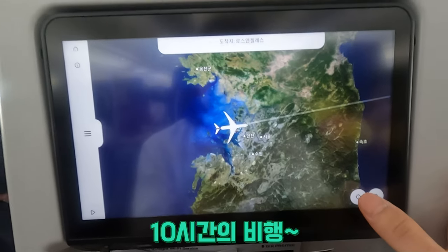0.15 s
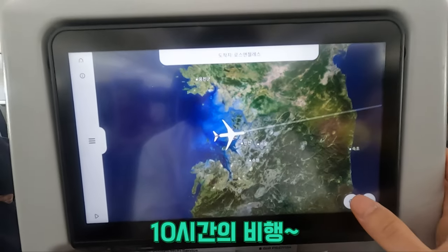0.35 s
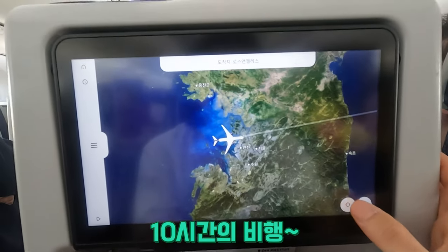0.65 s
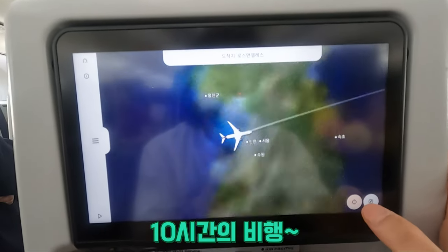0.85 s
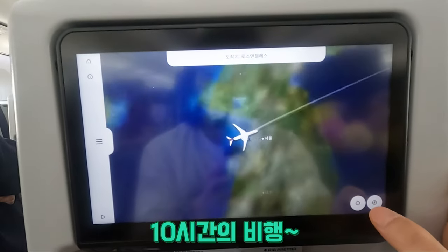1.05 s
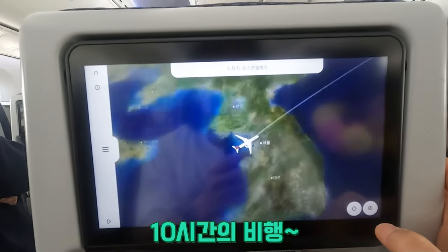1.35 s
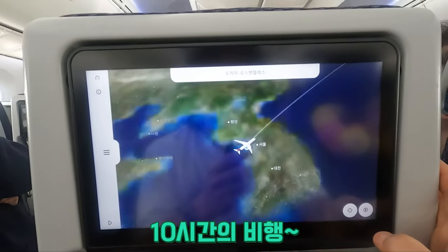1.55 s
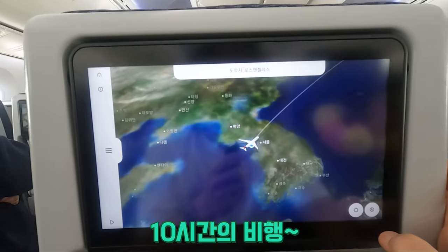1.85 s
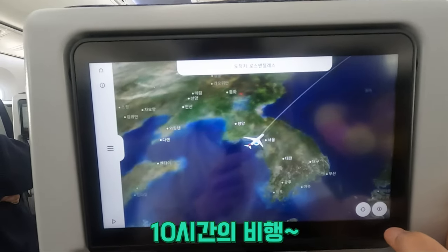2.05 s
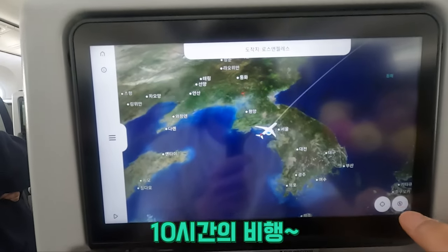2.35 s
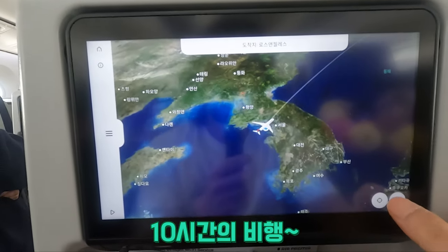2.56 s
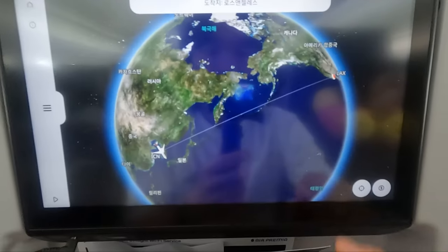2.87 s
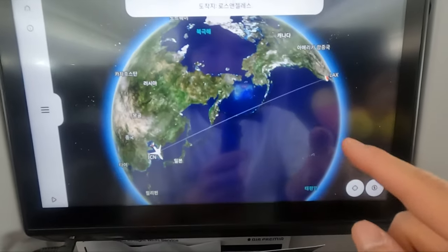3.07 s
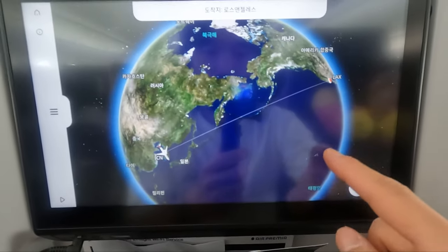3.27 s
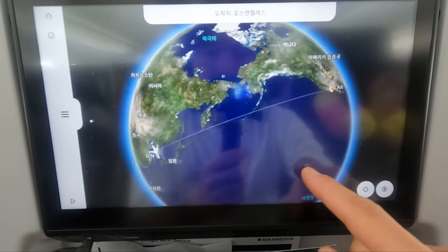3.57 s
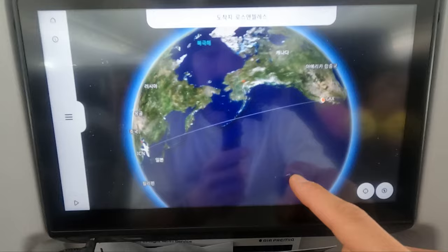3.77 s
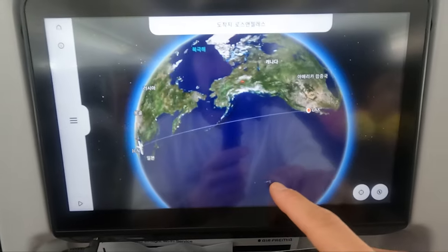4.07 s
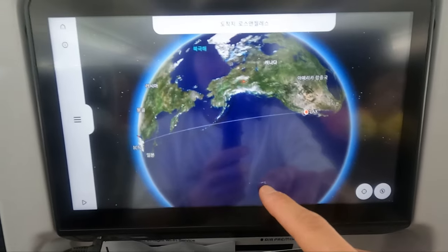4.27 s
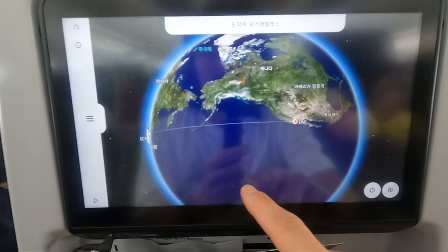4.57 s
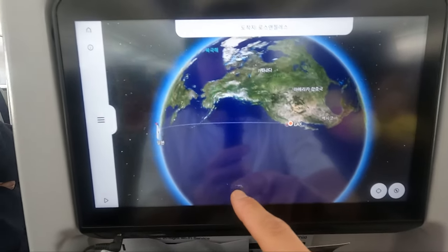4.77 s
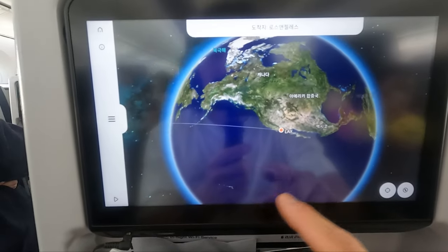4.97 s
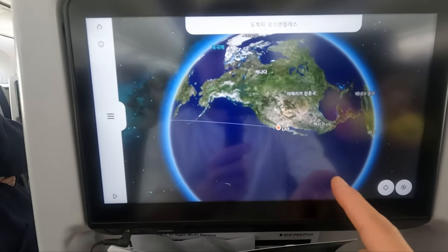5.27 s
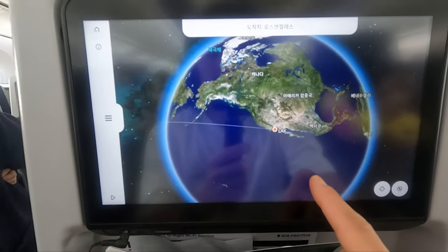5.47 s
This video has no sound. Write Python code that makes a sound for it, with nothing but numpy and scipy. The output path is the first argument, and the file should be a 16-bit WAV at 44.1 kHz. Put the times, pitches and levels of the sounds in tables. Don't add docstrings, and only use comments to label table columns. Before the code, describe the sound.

A handheld device close to a seatback screen captures continuous jet cabin noise: bassy droning, soft ventilation rush and barely audible thin whines. A small finger tick comes early. At just under three seconds the scene abruptly changes from narrow to wide, with slightly different rumble; faint skin or sleeve brushes follow while the drone carries on, without fading out.

```python
import sys
import numpy as np
from scipy import signal
from scipy.fft import rfft
from scipy.io import wavfile
from scipy.ndimage import uniform_filter1d, minimum_filter1d

SR = 44100
rng = np.random.default_rng(int(sys.argv[2]) if len(sys.argv) > 2 else 0)


def output_pcm(signal):
    pcm = np.clip(np.atleast_2d(signal).T, -1, 1) * 32767
    wavfile.write(sys.argv[1], SR, np.round(pcm).astype(np.int16))


def voltage_ratio(level):
    return 10 ** (np.asarray(level, float) / 20)


N = 248194

CHANGE_S, CHANGE_JUMP = 2.79522, .22
# pitch_hz, level_db (per Hz)
HULL_BOOM = [
    [(10, -6), (16, 2), (25, -5), (34, -0.5), (50, -9.5), (65, -3.5), (98, -6), (112, -7), (130, -2.5),
     (150, 0), (172, -3), (200, -5), (218, -17.5), (420, -25.5)],
    [(10, -1.5), (16, 8.5), (23, 6), (33, -4), (55, -1), (68, -1), (95, -2), (110, -7.5), (125, -2.5),
     (150, -6), (175, -3.5), (200, -5.5), (235, -18), (420, -23)],
]
# pitch_hz, level_db (per Hz)
AIR_RUSH = [
    [(140, -31), (230, -5.5), (314, -5.5), (520, -19), (651, -17.5), (722, -23), (937, -24), (1220, -22),
     (1630, -29.5), (2010, -29.5), (2610, -32.5), (7250, -46.5), (8920, -56.5), (12400, -63), (14500, -89)],
    [(140, -17), (230, -3), (260, -7.5), (429, -14), (511, -21.5), (640, -21), (722, -28), (1150, -22.5),
     (1690, -29.5), (2040, -30), (4380, -40.5), (5780, -40.5), (10600, -59.5), (12400, -60.5),
     (14500, -102.5)],
]
# pitch_hz, width_hz, level_db
DUCTS = [(573, 33, 2.5), (835, 60, 5), (1160, 84, 2), (2050, 160, 1), (3520, 540, 1.2), (12400, 400, 2.5)]
# pitch_hz, level_db (rms)
WHINES = [
    [(2568, -71), (5663, -83), (7079, -88), (8263, -92), (8371, -93), (8495, -90), (9017, -98),
     (10002, -98), (10331, -100), (10987, -91), (11326, -101), (12037, -99), (12102, -99), (13011, -102)],
    [(2568, -68), (4134, -75), (4899, -76), (5669, -75), (6212, -82), (6374, -83), (7084, -82), (8263, -89),
     (8500, -88), (9017, -92), (10331, -93), (10987, -86), (11332, -90), (12042, -96), (12667, -98),
     (13011, -96)],
]
# start_s, length_s, level_db, low_edge_hz, high_edge_hz
STROKES = [(.2, .06, -83, 10000, 14000), (1.232, .062, -62, 5800, 15500), (1.236, .05, -55, 2500, 4800),
           (1.42, .18, -82, 11000, 14800), (1.63, .24, -78, 9500, 15300), (1.8, .2, -80, 10500, 14800),
           (2.1, .1, -74, 5500, 8500), (2.4, .06, -80, 11000, 14800), (3.37, .13, -70, 6500, 10500),
           (3.765, .09, -63, 4300, 13000), (4.0, .11, -65, 3800, 12000), (4.158, .018, -57, 4300, 5100),
           (4.97, .06, -70, 4000, 9000), (5.17, .05, -78, 7000, 11000)]
# time_s, width_db
STEREO_WIDTH = [(0, -41), (2.3, -46.5), (2.55, -22), (2.8, -20)]
# pitch_hz, level_db
TOO_FAINT = [
    [(7000, -125), (10000, -113), (12500, -114), (13600, -108)],
    [(7000, -118), (10000, -109), (12500, -111), (13600, -106)],
]
# pitch_hz, level_db
TOO_HIDDEN = [
    [(7500, -40), (9000, -14), (13000, -14)],
    [(6500, -40), (8500, -10), (13000, -11)],
]
# pitch_hz, likeness (0 to 1)
PORT_LIKENESS = [(60, 1), (170, .9993), (290, .99), (630, .84), (1370, .74), (3010, .6), (6570, .6),
                 (14400, .55)]
# pitch_hz, difference_db
LEFT_LOUDER = [(60, .4), (200, .5), (370, 1.3), (690, 1.2), (1260, 3), (2320, 2.5), (4260, 1.7),
               (7820, 2.5), (14400, 3.5)]
# pitch_hz, lead_rad
LEFT_AHEAD = [(250, 0), (1030, -.4), (3010, -.7), (4820, 0)]
# boom_db, rush_db, brightness_db (per octave above 2 kHz)
LEVELS = [
    (-24.5, -36, -2.5),
    (-25.5, -36, -2.5),
]
# time_s, level_db
BUFFETING = [
    [(0, 2.5), (.6, -0.5), (1.1, 1), (1.7, 0.5), (2.2, 0.5), (2.8, -1.5)],
    [(2.8, -0.5), (3.3, 1.5), (3.9, 1), (4.4, 1.5), (5.0, 1), (5.63, 0.5)],
]
# middle_s, length_s, pitch_hz, level_db (rms at the top)
GUSTS = [
    [(.15, .6, 42.6, -26.5), (.48, 0.33, 42.7, -20), (.88, .4, 39.2, -19), (1.48, 0.4, 41.3, -19.5),
     (1.95, 0.38, 42.7, -24), (2.27, 0.47, 39.5, -20.5), (2.62, .25, 39, -20), (.22, .4, 75.1, -23),
     (1.13, 0.17, 65, -25.5), (1.5, 0.53, 90.5, -29.5), (2.18, 0.33, 89.4, -27.5), (2.58, 0.51, 85.9, -24)],
    [(3.0, 0.32, 43.6, -18.5), (3.5, 0.68, 41.65, -26), (4.1, 0.41, 42.6, -25.5), (4.57, 0.49, 37.2, -22.5),
     (4.82, 0.21, 43, -22), (5.05, 0.15, 36.3, -22), (5.38, 0.37, 36.2, -21.5), (2.9, 0.11, 77, -18),
     (3.15, 0.52, 77.6, -19.5), (3.55, 0.43, 76.6, -24), (3.88, 0.38, 71.8, -21), (4.25, 0.62, 79.55, -20),
     (4.65, 0.42, 77, -19.5), (5.0, 0.56, 81.2, -19), (5.27, 0.54, 74.9, -20.5), (5.53, 0.42, 66.5, -21.5)],
]


def evened(x):
    return x / np.sqrt(np.mean(abs(x) ** 2) + 1e-20)


def read(points, hz):
    f, value = np.transpose(points)
    return np.interp(np.log(hz + 1), np.log(f + 1), value)


def over_time(points, t):
    return np.interp(t, *np.transpose(points))


def grid(size):
    return np.fft.rfftfreq(size, 1 / SR), np.arange(4 * N // size + 5) * size / 4 / SR


def ports(field_db, size):
    hz = grid(size)[0]
    a, b, c, d = rng.standard_normal(field_db.shape[::-1] + (4,)).T
    same = np.clip(read(PORT_LIKENESS, hz), 0, 1)[:, None]
    left = a + 1j * b
    right = same * left + np.sqrt(1 - same ** 2) * (c + 1j * d)
    right = right * np.exp(-1j * read(LEFT_AHEAD, hz))[:, None]
    lean = voltage_ratio(read(LEFT_LOUDER, hz) / 2)[:, None]
    z = np.array([left * lean, right / lean]) * voltage_ratio(field_db)
    return signal.istft(z, nperseg=size, noverlap=size * 3 // 4)[1][:, :N]


def banded(x, low_hz, high_hz):
    hz = np.fft.rfftfreq(N, 1 / SR)
    inside = (hz > low_hz) & (hz < high_hz)
    return np.sqrt(2 * np.sum(abs(rfft(x.mean(0))[inside]) ** 2)) / N


def whines(lines, waver_db=2.4, waver_hz=2.6):
    out, t = np.zeros((2, N)), np.arange(0, N, 64)
    for hz, db in lines:
        drift = rng.standard_normal((2, len(t)))
        pitch, level = [np.interp(np.arange(N), t, evened(uniform_filter1d(v, 100))) for v in drift]
        turn = 2 * np.pi * np.cumsum(hz + waver_hz * pitch) / SR
        turn = turn + rng.uniform(0, 1.9, (2, 1))
        out += np.sqrt(2) * voltage_ratio(db + 2.2 + waver_db * level) * np.sin(turn)
    return out


def rustles():
    out = np.zeros((2, N))
    for s, length, db, low_hz, high_hz in STROKES:
        n = round(length * SR)
        noise = rng.standard_normal((4, 12000))[:, :n]
        roughness = voltage_ratio(1.8 * evened(uniform_filter1d(noise[3], 90)))
        grain = (noise[0] + .6 * noise[1:3]) * roughness
        sos = signal.butter(4, [low_hz, min(high_hz, 20000)], "bandpass", fs=SR, output="sos")
        dull = signal.lfilter(*signal.butter(2, low_hz, fs=SR), signal.sosfilt(sos, grain))
        swell = np.sin(np.pi * np.sqrt(np.linspace(0, 1, n)))
        out[:, round(s * SR):][:, :n] += voltage_ratio(db) * evened(dull) * evened(swell)
    return out


def rush(shape, buffet, level_db, bright_db, patchy_db=0.24, size=1024):
    hz, t = grid(size)
    ducts_db = sum(db / (1 + (2 * (hz - f) / w) ** 2) for f, w, db in DUCTS)
    fade_db = 60 * np.clip(np.log2((hz + 1) / 235), -2, 0)
    treble_db = np.clip(np.log2((hz + 1) / 2000), 0, 1.5) * bright_db
    patches = rng.standard_normal((len(t), len(hz)))
    patches = evened(uniform_filter1d(uniform_filter1d(patches, 16, 0), 14, 1)).T
    settle_db = 1.7 * np.exp(-np.maximum(t - buffet[0][0], 0) / 0.87)
    flow_db = .3 * over_time(buffet, t) + settle_db
    colour_db = read(shape, hz) + ducts_db + fade_db + treble_db
    x = ports(colour_db[:, None] + patchy_db * patches + flow_db, size)
    return x / banded(x, 242, 1800) * voltage_ratio(level_db)


def drone(gusts, pitch_wander=.04, level_flutter=.4, trim_db=-1.5):
    t, out = np.arange(N) / SR, np.zeros(N)
    slow = uniform_filter1d(uniform_filter1d(rng.standard_normal((2, N)), 1500), 1500)
    wander, flutter = evened(slow)
    clock = np.cumsum(1 + pitch_wander * wander) / SR
    for s, length, hz, db in gusts:
        on = abs(t - s) < length / 2
        swell = np.cos(np.pi * (t[on] - s) / length)
        out[on] += voltage_ratio(db) * swell * np.sin(2 * np.pi * hz * (clock[on] - np.interp(s, t, clock)))
    sides = voltage_ratio(trim_db + np.array([[.2], [-.2]]))
    return np.sqrt(2) * (1 + level_flutter * flutter) * out * sides


def boom(shape, buffet, level_db, size=4096):
    hz, t = grid(size)
    fade_db = -60 * np.clip(np.log2((hz + 1) / 235), 0, 2)
    x = ports((read(shape, hz) + fade_db)[:, None] + over_time(buffet, t), size)
    return x * voltage_ratio(level_db) / banded(x, 108, 184.5)


def thinned_treble(x, too_faint, too_hidden, width, size=2048):
    hz, t, z = signal.stft(x, SR, nperseg=size)
    middle = z.mean(0)
    z = middle + np.where(hz[:, None] > 11000, .7, width(t)) * (z - middle)
    power = uniform_filter1d(abs(middle) ** 2, size=3, axis=1)
    band = np.add.reduceat(power, np.arange(0, len(hz), 16), axis=0)[np.arange(len(hz)) // 16] / 16
    drift = rng.standard_normal((len(hz) // 8 + 1, len(t)))
    drift = evened(uniform_filter1d(drift, size=3))[np.arange(len(hz)) // 8]
    band = band * voltage_ratio(2 * 4 * drift)
    peak = -minimum_filter1d(-power, size=17, axis=0) * voltage_ratio(2 * 3 * drift)
    loud_enough = band > voltage_ratio(2 * read(too_faint, hz))[:, None]
    clear_enough = power > peak * voltage_ratio(2 * read(too_hidden, hz))[:, None]
    return signal.istft(z * (loud_enough & clear_enough), SR, nperseg=size)[1][:, :N]


def view(k, strokes):
    boom_db, rush_db, bright_db = LEVELS[k]
    hull = boom(HULL_BOOM[k], BUFFETING[k], boom_db) + drone(GUSTS[k])
    air = rush(AIR_RUSH[k], BUFFETING[k], rush_db, bright_db)
    return hull + air + whines(WHINES[k]) + strokes


def scene():
    t, strokes = np.arange(N) / SR, rustles()
    first = thinned_treble(view(0, strokes), TOO_FAINT[0], TOO_HIDDEN[0],
                       lambda s: voltage_ratio(over_time(STEREO_WIDTH, s)))
    second = thinned_treble(view(1, strokes), TOO_FAINT[1], TOO_HIDDEN[1], np.ones_like)
    at = round(CHANGE_S * SR)
    near = np.exp(-((t - CHANGE_S) / .0025) ** 2)
    first = first + (-.18 - first[:, at].mean()) * near
    first = first - first[:, :1] * np.exp(-(t / .002) ** 2)
    second = second + (CHANGE_JUMP - .18 - second[:, at].mean()) * near
    second = second + (.19 - second[:, -1].mean()) * np.exp(-((t - t[-1]) / .003) ** 2)
    return np.where(np.arange(N) < at, first, second)


def roll_off(x):
    return signal.sosfilt(signal.butter(12, 14980, fs=SR, output="sos"), x)


def record(dry):
    crest = -minimum_filter1d(-abs(dry).max(0), 400)
    over_db = np.maximum(20 * np.log10(crest + 1e-9) + 11.3, 0)
    ease_db = uniform_filter1d(uniform_filter1d(over_db, 300), 300)
    return roll_off(dry / voltage_ratio(0.38 * ease_db))


dry = scene()
out = record(dry)
output_pcm(out)
```